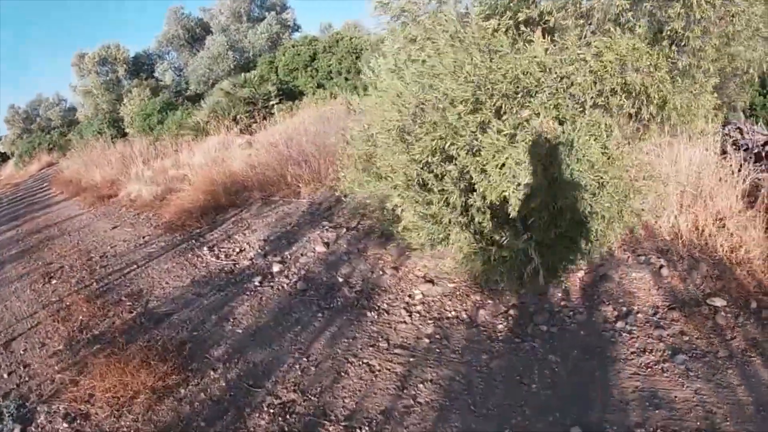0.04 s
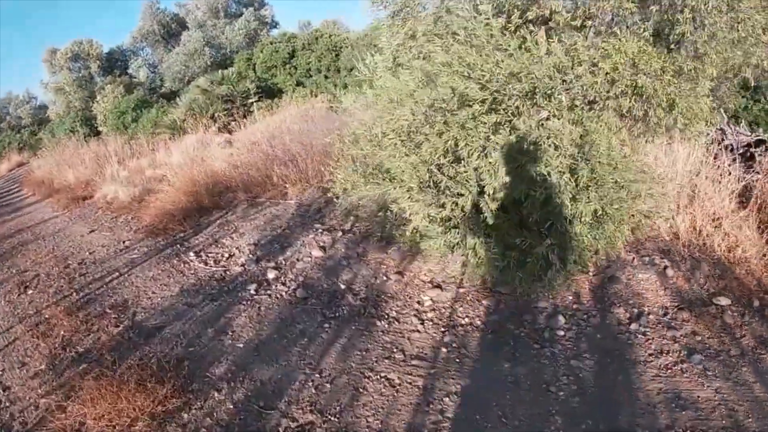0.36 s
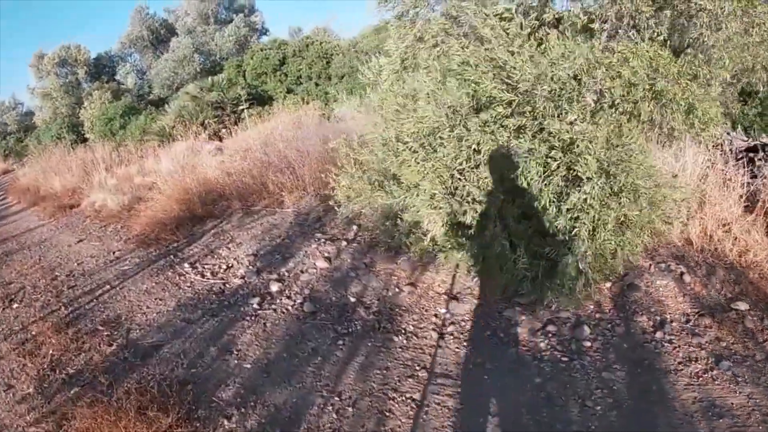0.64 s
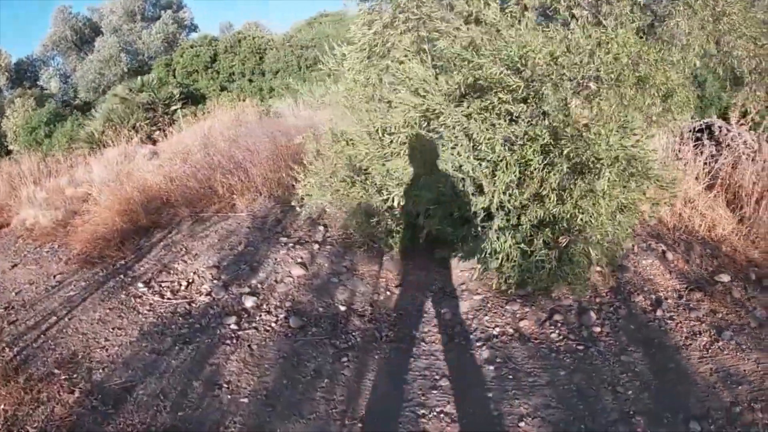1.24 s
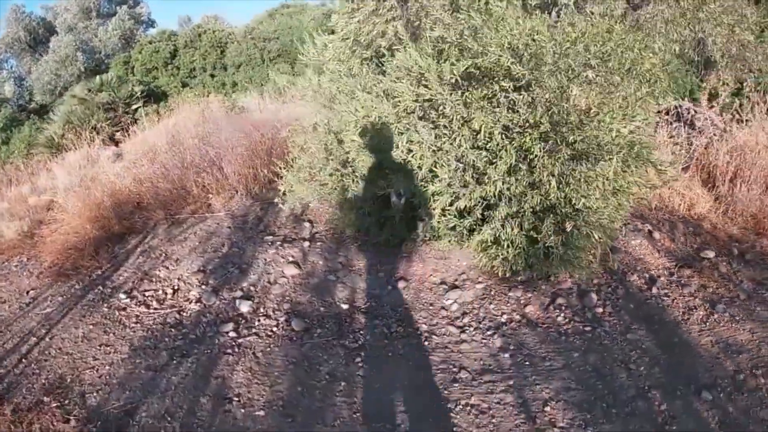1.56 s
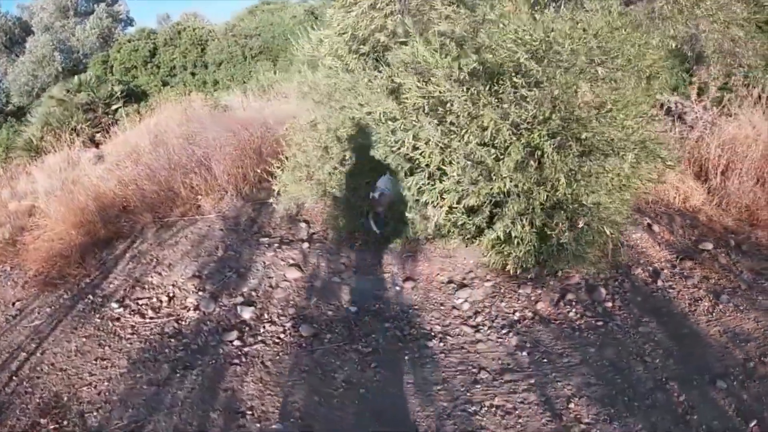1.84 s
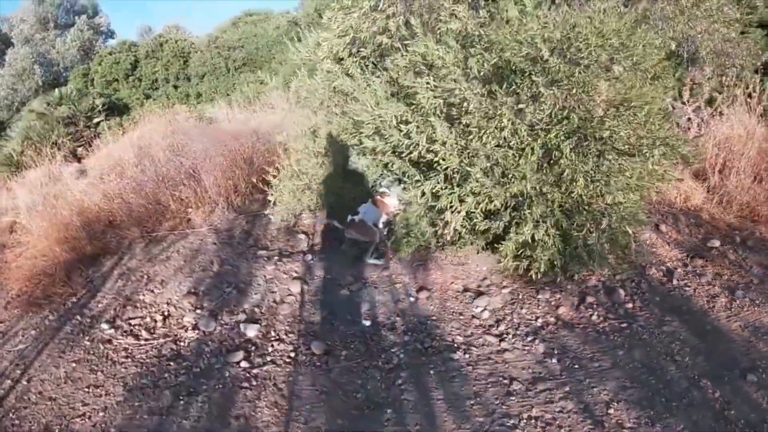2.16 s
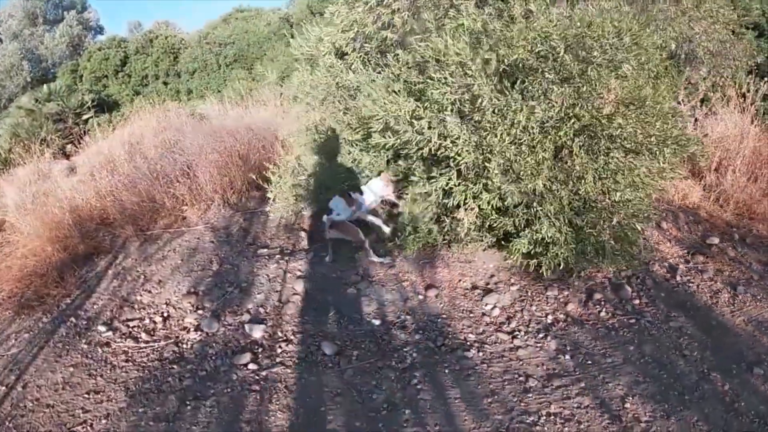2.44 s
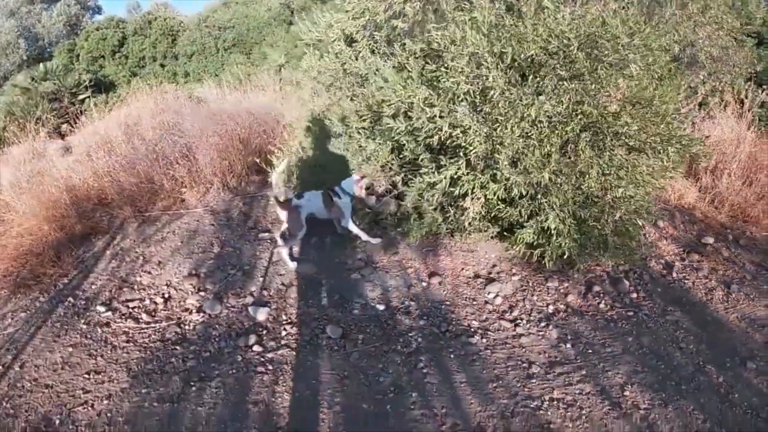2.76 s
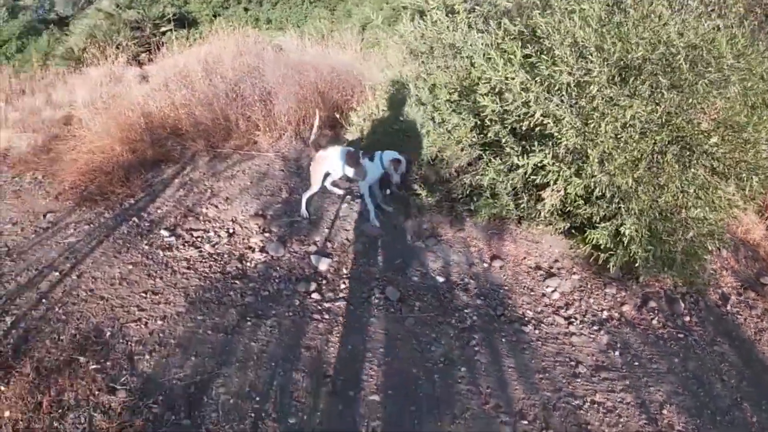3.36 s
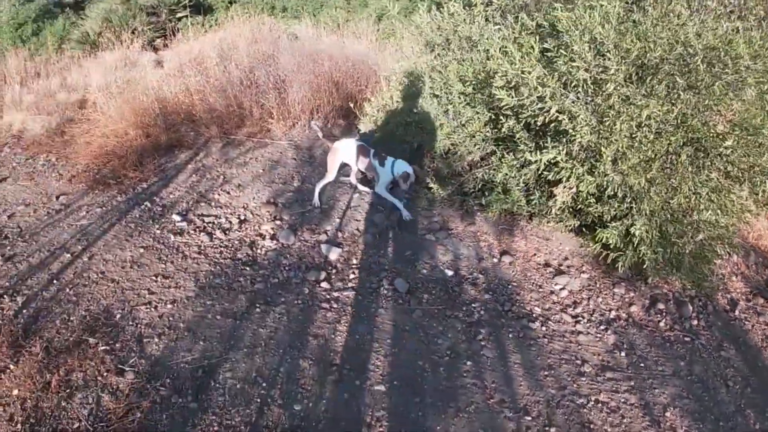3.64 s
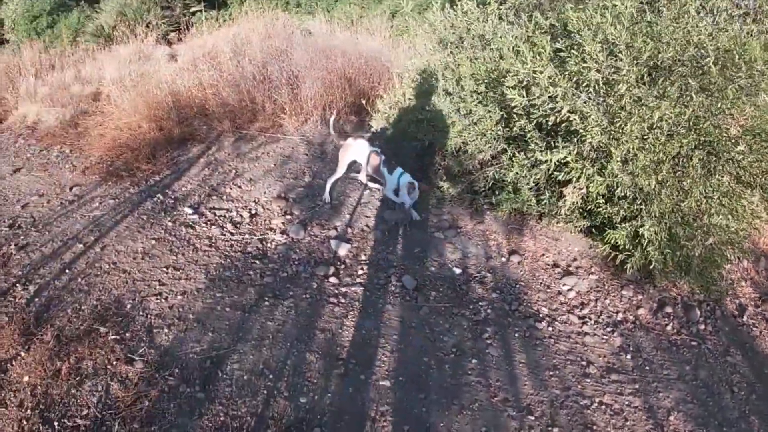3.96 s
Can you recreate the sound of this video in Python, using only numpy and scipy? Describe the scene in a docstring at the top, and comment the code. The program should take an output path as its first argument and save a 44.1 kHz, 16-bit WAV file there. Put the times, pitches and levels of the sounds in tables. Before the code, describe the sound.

Shrill dog whines are the main sound on a stony hillside. Gravel footsteps and knocking stones come first, then leaves rustle and twigs snap as the dog whines three times, with light wind rumbling on the microphone.

```python
"""Light wind buffets the microphone on a stony hillside as shoes scrunch over gravel and knock stones.
A dog pushes through a dry bush: leaves rustle louder, twigs snap and rubbing branches squeak.
Just after two seconds it gives a long, shrill, wavering whine, then a short arched one, and it is
starting a third as the scene ends. The sound is mono but for the highest treble."""
import sys
import numpy as np
from scipy import signal
from scipy.fft import rfft, irfft, next_fast_len
from scipy.io import wavfile
from scipy.ndimage import map_coordinates

SR = 44100
rng = np.random.default_rng(int(sys.argv[2]) if len(sys.argv) > 2 else 0)


def pcm_store(signal):
    """Save signal as 16-bit PCM."""
    levels = np.round(np.clip(np.atleast_2d(signal), -1, 1) * 32767)
    wavfile.write(sys.argv[1], SR, levels.astype(np.int16).T)


N = 176400
TIME = np.arange(N) / SR
TOP_HZ = 15300


def amp(db):
    """Decibels to gain."""
    return 10 ** (np.asarray(db) / 20)


def unit(x):
    """Scale to rms 1."""
    return x / np.sqrt(np.mean(x ** 2) + 1e-20)


def along(points, hz):
    """Read (Hz, value) points on a log frequency axis."""
    f, v = np.transpose(points)
    return np.interp(np.log(hz + 1), np.log(f + 1), v)


def curves(rows):
    """One automation curve for each column after the time."""
    s, *cols = np.transpose(rows)
    return [np.interp(TIME, s, c) for c in cols]


def wobble(rate):
    """A smooth random curve, rate knots a second."""
    return map_coordinates(rng.standard_normal(int(N * rate / SR) + 4), [TIME * rate])


def filtered(x, response):
    """EQ x with a gain that is a function of frequency."""
    m = next_fast_len(N + SR // 2)
    return irfft(rfft(x, m) * response(np.fft.rfftfreq(m, 1 / SR)), m)[..., :N]


def coloured(x, spectrum):
    """x with a (Hz, dB) colour, at rms 1."""
    return unit(filtered(x, lambda hz: amp(along(spectrum, hz))))


def noise(spectrum):
    """Coloured noise of rms 1."""
    return coloured(rng.standard_normal(N), spectrum)


def burst(length, edges_hz, kind):
    """Short filtered noise of rms 1."""
    sos = signal.butter(3, edges_hz, kind, fs=SR, output='sos')
    return unit(signal.sosfilt(sos, rng.standard_normal(length)))


def eddies(spectrum, evenness):
    """Noise whose chance swells are partly evened out."""
    z = signal.hilbert(noise(spectrum))
    return unit(z.real / (np.abs(z) + 0.51) ** evenness)


def grains(spectrum, rate, spread_db):
    """Tiny random clicks of uneven size, at rms 1."""
    size = amp(spread_db * np.minimum(rng.exponential(size=N), 4))
    hits = rng.random(N) < rate / SR
    return coloured(hits * size * rng.choice([-1, 1], N), spectrum)


def swells(rows):
    """Envelope of bell-shaped swells."""
    return sum(amp(db) * np.exp(-.5 * ((TIME - s) / half) ** 4) for s, half, db in rows)


def add(track, s, sound):
    """Mix a short sound in at time s."""
    part = track[round(s * SR):][:len(sound)]
    part += sound[:len(part)]


# Foliage EQ. Each row: frequency in Hz, gain in dB.
FOLIAGE_EQ = [(60, 5), (150, 3.5), (210, -1.5), (340, -16.5), (450, -13.5), (750, -7), (1100, -9),
              (1800, -9.5), (3300, -5), (4300, -11), (5200, -2.5), (6100, -0.5), (6800, -7.5), (7500, -17),
              (10600, -15), (13000, -30), (15000, -39)]
# Foliage fader. Each row: time in seconds, level in dB.
FOLIAGE_LEVEL = [(0, -54), (.8, -54.5), (1.05, -57), (1.15, -58), (1.3, -55), (2.5, -51.5), (3.2, -55.5),
                 (3.6, -57.5), (3.72, -55), (4, -56.5)]

def distant_foliage():
    """A soft, drifting bed of far-off leaves."""
    level_db, = curves(FOLIAGE_LEVEL)
    return amp(level_db + 1.8 * wobble(4.54)) * noise(FOLIAGE_EQ)


# Reverb decay. Each row: frequency in Hz, T60 in seconds.
HILLSIDE_DECAY = [(300, .15), (3000, 0.2), (10000, 0.1)]

def hillside(x):
    """Faint scatter from the slope and the bushes."""
    hz, t, spectra = signal.stft(rng.standard_normal(SR // 2), SR, nperseg=256)
    decay = amp(-60 * t / along(HILLSIDE_DECAY, hz)[:, None])
    _, tail = signal.istft(spectra * decay, SR, nperseg=256)
    return amp(-29) * signal.fftconvolve(x, tail / np.linalg.norm(tail))[:N]


# Rumble fader. Each row: time in seconds, level in dB.
RUMBLE_LEVEL = [(0.0, -37.5), (0.32, -49.5), (0.93, -38), (1.17, -44.5), (1.22, -27), (1.29, -38),
                (1.63, -32), (1.76, -48), (1.83, -40), (1.96, -56), (2.25, -27), (2.29, -37), (2.41, -31),
                (2.7, -36.5), (2.73, -30), (2.91, -48), (3.36, -36.5), (4.0, -44)]
# Gusts. Each row: centre and half length in seconds, level in dB.
GUSTS = [(1.25, 0.036, -30), (1.398, 0.0096, -22), (1.45, 0.23, -41.5), (1.517, 0.026, -22.5),
         (1.628, 0.026, -24), (2.24, 0.039, -38), (2.73, 0.019, -35), (3.57, 0.052, -40.5)]
# Wind EQs. Each row: frequency in Hz, gain in dB.
RUMBLE_EQ = [(10, -5), (22, 3), (38, 1.5), (55, -5.5), (80, -17.5), (130, -31), (220, -37.5), (500, -54.5),
             (1500, -82)]
GUST_EQ = [(15, -7), (40, 0), (65, 6), (110, -4.5), (160, -15.5), (230, -34.5), (500, -51), (1500, -83)]

def wind():
    """Wind rumbles on the microphone, with a few harder gusts."""
    level_db, = curves(RUMBLE_LEVEL)
    rumble = amp(level_db) * eddies(RUMBLE_EQ, evenness=0.35)
    return rumble + swells(GUSTS) * eddies(GUST_EQ, evenness=0.49)


# Stone hits. Each row: start in seconds, relative level in dB, pitch in Hz, T60 in seconds.
STONES = [(0.26, -34.5, 592, .05), (.27, -36.5, 2400, 0.016), (.359, -37.5, 1940, 0.024),
          (.447, -42.5, 1080, 0.044), (.449, -39, 1980, .02), (.479, -41.5, 603, 0.045),
          (.506, -32.5, 904, 0.032), (.512, -36.5, 590, 0.05), (.543, -38.5, 554, 0.1),
          (.562, -36.5, 895, 0.032), (0.609, -32, 800, 0.016), (.610, -29.5, 2780, .009),
          (.716, -43, 870, 0.017), (.753, -34.5, 704, 0.026), (0.7657, -15, 1880, 0.0078),
          (.767, -25, 1330, 0.017), (.77, -27.5, 1630, 0.016), (.808, -32.5, 2140, 0.013),
          (.897, -48, 997, 0.069), (1.075, -50.5, 728, 0.078), (2.182, -34.5, 1260, .02),
          (2.197, -30, 1300, 0.018), (2.442, -20, 910, .012), (2.532, -41.5, 760, 0.021),
          (2.896, -28.5, 1700, 0.011), (3.087, -29.5, 1460, 0.018), (3.13, -32, 1890, 0.01)]
# A stone's partials. Each row: multiple of the pitch, gain in dB.
STONE_RING = [(.55, -19), (1.0, 2.5), (1.37, -8.5), (1.9, -24)]

def stones():
    """Stones knock together under foot: a short ring with grit in it."""
    track, t = np.zeros(N), TIME[:SR // 8]
    attack = 1 - np.exp(-t / 0.00013)
    for s, db, hz, t60 in STONES:
        ring = sum(amp(gain + rng.normal(0, 1.8)) * np.sin(2 * np.pi * hz * ratio * t)
                   for ratio, gain in STONE_RING)
        grit = amp(-6.5) * burst(len(t), [hz / 2, hz * 2], 'band')
        add(track, s, amp(db - 5 - 60 * t / t60) * attack * (ring + grit))
    return track


# Footfalls. Each row: start in seconds, level in dB, low-pass cutoff in Hz.
THUDS = [(.18, -43.5, 168), (.638, -46, 260), (.795, -38, 170), (.81, -43.5, 280), (2.185, -36, 330),
         (2.443, -44.5, 446)]
# Scrunches. Each row: centre and half length in seconds, level in dB.
SCRUNCHES = [(.03, 0.035, -60.5), (.18, .025, -59.5), (.27, 0.028, -57.5), (.53, 0.074, -53.5),
             (.63, 0.022, -55), (.76, 0.045, -52), (.88, 0.054, -65), (1.87, 0.017, -54.5),
             (2.19, 0.018, -47), (2.67, .04, -59), (2.9, 0.058, -49.5), (3.0, 0.049, -49), (4.0, 0.02, -50)]
# Gravel EQ. Each row: frequency in Hz, gain in dB.
GRAVEL_EQ = [(150, 3), (350, -6), (620, 5.5), (950, 0.5), (1400, -3), (2600, -7.5), (5000, -21),
             (12000, -40)]

def steps(thud_t60=0.12):
    """Soles land with a dull thud and scrunch the gravel."""
    thuds, t = np.zeros(N), TIME[:SR // 8]
    attack = 1 - np.exp(-t / 0.00083)
    for s, db, hz in THUDS:
        add(thuds, s, amp(db - 60 * t / thud_t60) * attack * burst(len(t), hz, 'low'))
    return thuds + swells(SCRUNCHES) * grains(GRAVEL_EQ, rate=900, spread_db=4.5)


# Scuffs. Each row: centre and half length in seconds, level in dB.
SCUFFS = [(1.45, 0.029, -57.5), (3.275, 0.018, -52), (3.81, 0.039, -50)]
# Dust EQ. Each row: frequency in Hz, gain in dB.
DUST_EQ = [(200, -18), (500, 0), (1300, 1), (2800, 2.5), (4500, -6), (12000, -32)]

def paws():
    """Paws scuff the dust in soft puffs."""
    return swells(SCUFFS) * noise(DUST_EQ)


# Squeaks. Each row: centre and half length in seconds, level in dB, pitch in Hz.
SQUEAKS = [(1.255, 0.0037, -42.5, 5250), (1.533, 0.0019, -40.5, 4380)]

def branches():
    """Branches squeak briefly as they rub."""
    return sum(swells([(s, half, db)]) * np.sin(2 * np.pi * hz * TIME + .4 * wobble(400))
               for s, half, db, hz in SQUEAKS)


# Rustle fader. Each row: time in seconds, relative level in dB.
RUSTLE_LEVEL = [(0, -68), (.27, -61), (.3, -59), (.36, -65), (.6, -61.5), (.8, -58), (.9, -71),
                (1.04, -55.5), (1.09, -61), (1.19, -74), (1.202, -42.5), (1.275, -47), (1.305, -59),
                (1.36, -56.5), (1.42, -60), (1.52, -54.5), (1.78, -58.5), (1.84, -51), (1.865, -43.5),
                (1.92, -50.5), (1.99, -42), (2.09, -46.5), (2.135, -38.5), (2.165, -47.5), (2.25, -46.5),
                (2.3, -49), (2.36, -47), (2.39, -38), (2.42, -43), (2.57, -52), (2.66, -45), (2.73, -47),
                (2.8, -46), (2.9, -50.5), (3.05, -51.5), (3.17, -55), (3.35, -54), (3.43, -50), (3.55, -51),
                (3.59, -54), (3.63, -68), (3.68, -52), (3.73, -74), (4, -68)]
# Leaf and twig EQ. Each row: frequency in Hz, gain in dB.
BUSH_EQ = [(180, -40), (300, -11), (669, -16), (1250, -6.5), (1440, -8.5), (1590, -5), (2480, -4),
           (5010, 0.5), (7670, -7.5), (9960, -2.5), (11900, -5.5), (15000, -26)]
# Snaps. Each row: start in seconds, relative level in dB.
TWIGS = [(.118, -35.5), (.281, -29.5), (.312, -35), (0.939, -28.5), (1.036, -43), (1.199, -31),
         (1.344, -36), (1.382, -36.5), (1.46, -35.5), (1.531, -43), (1.722, -35), (2.134, -21),
         (2.187, -25.5), (2.253, -26), (3.237, -31.5), (3.589, -35), (3.705, -36.5)]

def bush(twig_t60=0.02):
    """Dry leaves swish and crackle against the dog; now and then a twig snaps."""
    swish = amp(-3.5) * noise(BUSH_EQ)
    crackle = amp(-5.5) * grains(BUSH_EQ, rate=1800, spread_db=5)
    level_db, = curves(RUSTLE_LEVEL)
    leaves = amp(level_db + 2.6 * wobble(60)) * (swish + crackle)
    snaps, t = np.zeros(N), TIME[:SR // 20]
    for s, db in TWIGS:
        add(snaps, s, amp(db - 9 - 60 * t / twig_t60))
    return leaves + snaps * noise(BUSH_EQ)


# Throat EQ from harmonic 3 up. Each row: frequency in Hz, gain in dB.
THROAT_EQ = [(3000, -4), (5000, 9.5), (6400, 3), (7500, -18.5), (8300, -3), (9900, 1.5), (10700, 2.5),
             (11500, -2.5), (12500, -12.5), (14000, -26), (15500, -30)]
# Vocal strain. Each row: time in seconds, roughness from 0 to 1.
STRAIN = [(2.27, 0.76), (2.39, 0.7), (2.425, 0.97), (2.46, 0.29), (2.56, 0), (2.68, 0.31), (2.78, 0.52),
          (2.84, 0.1), (2.91, 0.56), (3.0, 0.24), (3.05, 0.6), (3.3, 0.43), (3.4, 0), (3.47, 0),
          (3.54, 0.55), (3.87, .25), (3.92, 0)]

def whine(pitch, levels, rolloff_db=3.5, attack_s=0.0028, release_s=0.012):
    """A whistling tone with harmonics; it trembles when the voice is strained."""
    hz, = curves(pitch)
    rough, = curves(STRAIN)
    first_db, second_db, upper_db = curves(levels)
    jitter = 0.0095 * rough * wobble(600)
    phase = 2 * np.pi * np.cumsum(hz * (1 + jitter)) / SR
    voice = np.zeros(N)
    for k in range(1, 9):
        if k < 3:
            db = first_db if k == 1 else second_db
        else:
            flutter_db = 3 * wobble(110)
            db = upper_db + along(THROAT_EQ, k * hz) - rolloff_db * (k - 3) + flutter_db
        shimmer_db = 2.5 * rough * wobble(400)
        voice += amp(db + shimmer_db) * (k * hz < TOP_HZ) * np.sin(k * phase)
    fade_in = np.clip((TIME - levels[0][0]) / attack_s, 0, 1)
    fade_out = np.clip((levels[-1][0] + release_s - TIME) / release_s, 0, 1)
    return np.sqrt(2) * voice * fade_in * fade_out


# Whine melodies. Each row: time in seconds, pitch in Hz.
PITCH_LONG = [(2.272, 2206), (2.30, 2652), (2.342, 3080), (2.349, 3014), (2.368, 3210), (2.393, 3290),
              (2.411, 3085), (2.420, 3184), (2.425, 3670), (2.435, 3036), (2.452, 3060), (2.48, 2893),
              (2.505, 2965), (2.53, 2892), (2.565, 2913), (2.60, 2818), (2.632, 2710), (2.70, 2947),
              (2.74, 3022), (2.769, 2790), (2.788, 3080), (2.82, 2962), (2.855, 2928), (2.89, 2773),
              (2.917, 2395), (2.95, 2525), (2.997, 2808), (3.022, 2653), (3.04, 2456), (3.056, 2424),
              (3.07, 1700)]
PITCH_ARCHED = [(3.285, 1080), (3.306, 1652), (3.356, 2335), (3.375, 2442), (3.39, 2422), (3.44, 2196),
                (3.48, 2108), (3.50, 2160), (3.529, 2160), (3.545, 1680), (3.565, 1342)]
PITCH_LAST = [(3.86, 2053), (3.867, 2143), (3.885, 2460), (3.91, 2595), (3.93, 2612), (3.95, 2612),
              (3.98, 2494), (4.0, 2512)]
# Whine faders. Each row: time in seconds, then fundamental, octave and pre-EQ upper harmonics in dB.
LEVEL_LONG = [(2.272, -33.5, -48, -58), (2.289, -33, -28.5, -39.5), (2.316, -20.5, -24.5, -43),
              (2.338, -32, -38, -32.5), (2.36, -24.5, -28, -42), (2.386, -37.5, -31.5, -25.5),
              (2.415, -24.5, -31, -32), (2.446, -22.5, -19.5, -33.5), (2.484, -16.5, -30.5, -48),
              (2.503, -27.5, -23, -39), (2.545, -18, -26, -46), (2.595, -21, -30.5, -45),
              (2.628, -26.5, -21, -53), (2.667, -23.5, -23.5, -45), (2.71, -38, -34, -48),
              (2.74, -24.5, -30, -44), (2.762, -34, -34.5, -52), (2.779, -24, -22.5, -46),
              (2.797, -36.5, -36, -36), (2.822, -20.5, -27.5, -40), (2.842, -17.5, -31, -53),
              (2.869, -34, -30.5, -50), (2.896, -19.5, -24.5, -44.5), (2.915, -30.5, -43, -40),
              (2.938, -21, -29.5, -50.5), (2.975, -23.5, -39, -36.5), (2.993, -18.5, -36.5, -43),
              (3.03, -19.5, -35.5, -38), (3.053, -29, -28, -43), (3.07, -61, -55, -63)]
LEVEL_ARCHED = [(3.285, -59, -52, -74), (3.30, -42, -44.5, -62), (3.313, -30.5, -62, -53),
                (3.34, -32, -37, -49), (3.362, -33.5, -20, -32), (3.377, -28, -27, -37.5),
                (3.41, -33.5, -18.5, -43), (3.428, -32, -23, -36.5), (3.445, -29.5, -30, -41),
                (3.485, -26.5, -42.5, -37.5), (3.505, -28, -46.5, -44.5), (3.528, -40, -24, -49),
                (3.54, -43, -45.5, -53), (3.558, -61, -41.5, -57), (3.565, -79, -58, -68)]
LEVEL_LAST = [(3.86, -35, -39, -55), (3.866, -30.5, -39.5, -50.5), (3.882, -51, -22.5, -36),
              (3.894, -35.5, -15, -31.5), (3.915, -31, -21, -37), (3.948, -28.5, -20, -38),
              (3.963, -29.5, -21, -34), (3.974, -27, -17.5, -29), (4.0, -29, -21, -26)]
# Reflections off the stony ground. Each row: delay in seconds, gain in dB.
BOUNCES = [(.0047, -24.5), (.0095, -18)]

def dog():
    """Three whines whose glides beat with their own bounce off the ground."""
    voice = whine(PITCH_LONG, LEVEL_LONG)
    voice += whine(PITCH_ARCHED, LEVEL_ARCHED)
    voice += whine(PITCH_LAST, LEVEL_LAST)
    return voice + sum(amp(db) * np.pad(voice, (round(s * SR), 0))[:N] for s, db in BOUNCES)


# Stereo width. Each row: frequency in Hz, linear side gain.
WIDTH = [(100, 0), (9000, 0.02), (11000, 0.05), (12500, 0.54), (15000, 0.8)]

def scene():
    """Everything sits in the middle; only the top of the rustle spreads."""
    near = dog() + bush() + branches() + stones() + steps() + paws()
    mid = near + hillside(near) + wind() + distant_foliage()
    side = filtered(bush(), lambda hz: along(WIDTH, hz))
    return np.array([mid + side, mid - side])


# Aliasing send. Each row: frequency in Hz, gain in dB.
ALIAS_SEND = [(7500, -70), (9000, -31), (10400, -16), (11800, -3), (12000, -60)]
# Treble pan. Each row: frequency in Hz, left boost and right cut in dB.
LEFT_LEAN = [(100, 0), (10500, 0), (12500, 2), (15000, 1.5)]

def record(dry, mirror_hz=12000):
    """The recorder aliases treble upwards, leans its top left and cuts at the band limit."""
    treble = filtered(dry, lambda hz: amp(along(ALIAS_SEND, hz)) * (hz < mirror_hz))
    carrier = np.exp(2j * np.pi * 2 * mirror_hz * TIME)
    mirrored = np.real(np.conj(signal.hilbert(treble)) * carrier)
    return filtered(dry + mirrored,
                    lambda hz: amp(np.outer([1, -1], along(LEFT_LEAN, hz))) * (hz < TOP_HZ))


dry = scene()
out = record(dry)
pcm_store(out)
```